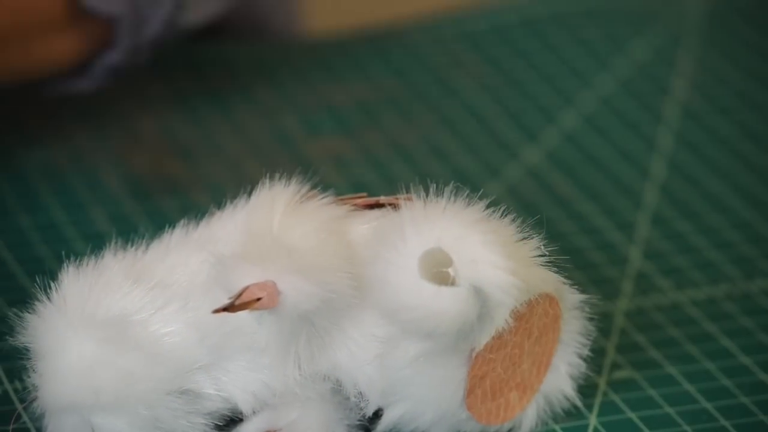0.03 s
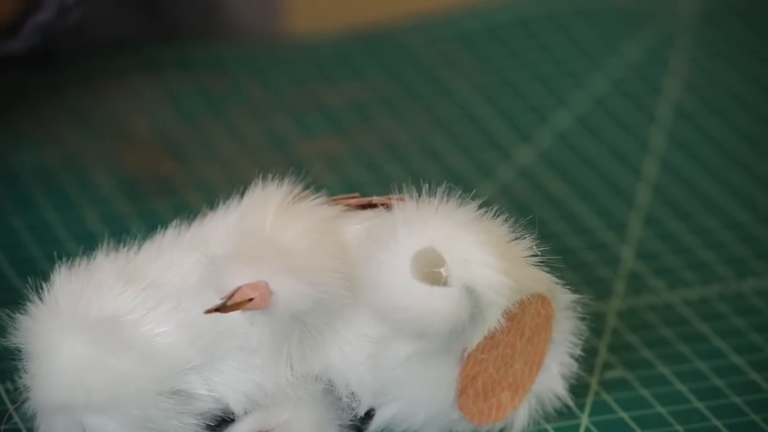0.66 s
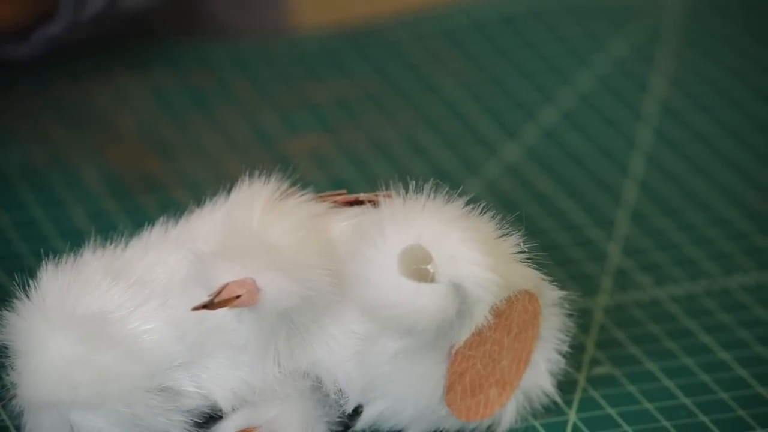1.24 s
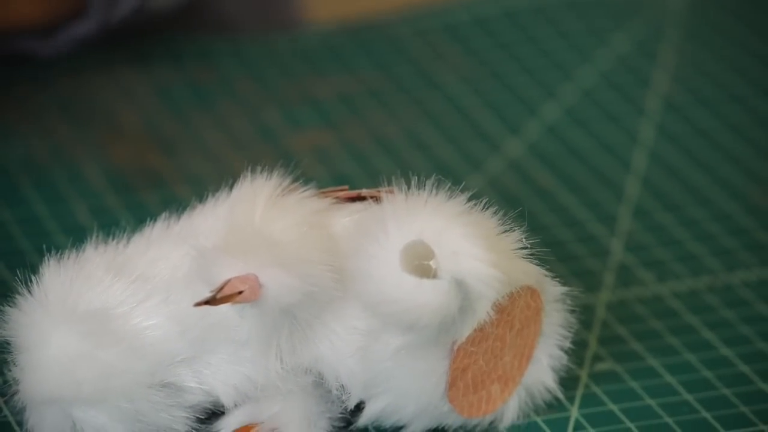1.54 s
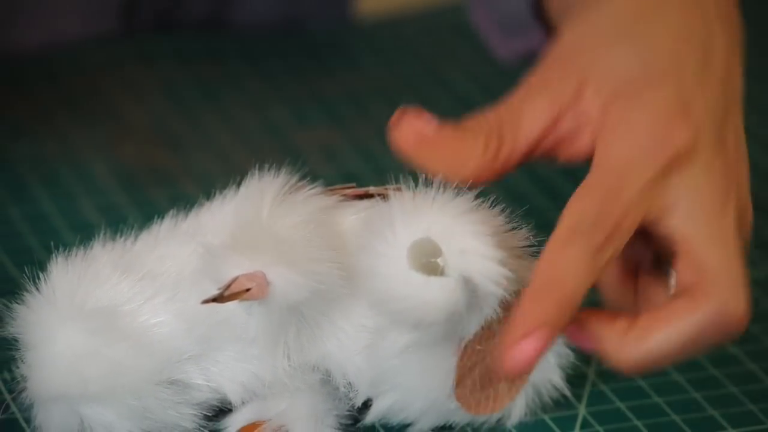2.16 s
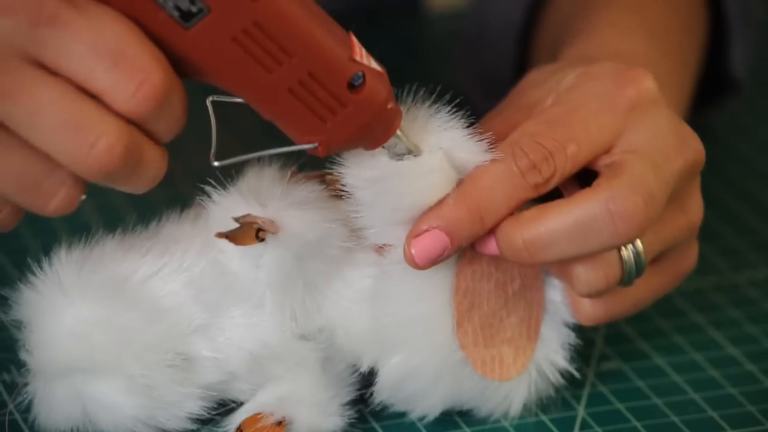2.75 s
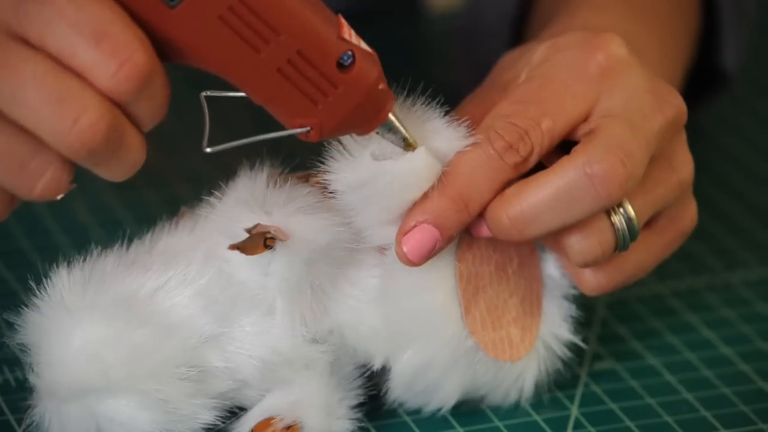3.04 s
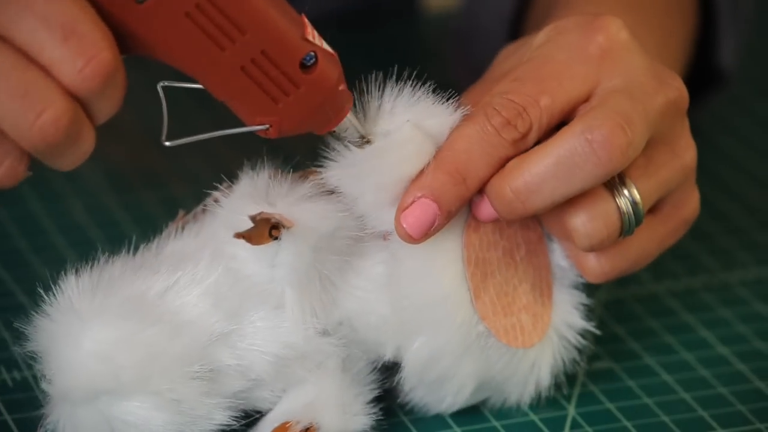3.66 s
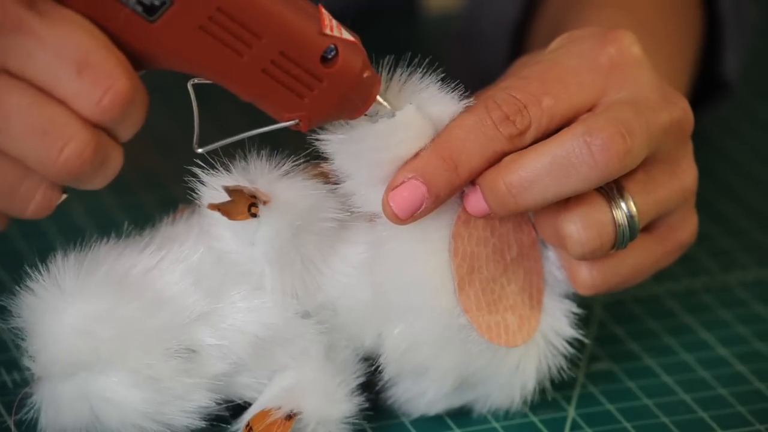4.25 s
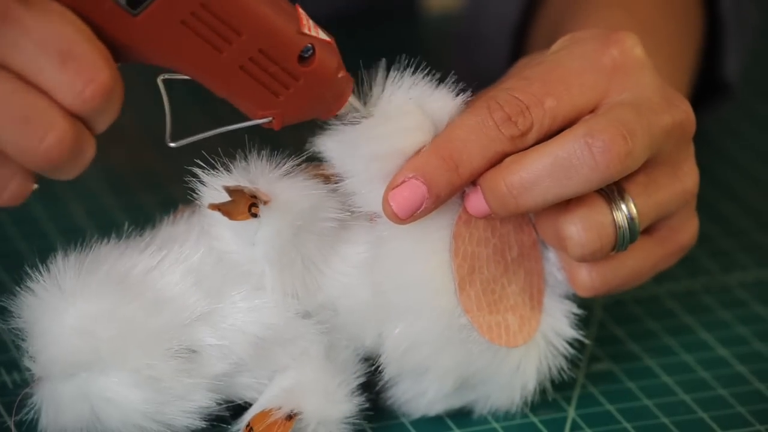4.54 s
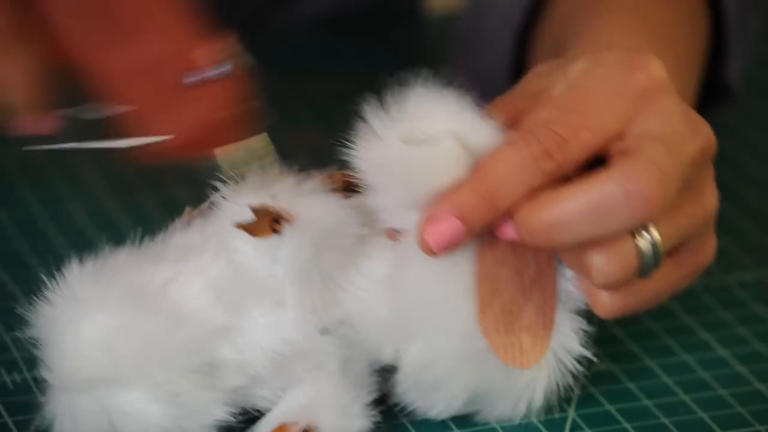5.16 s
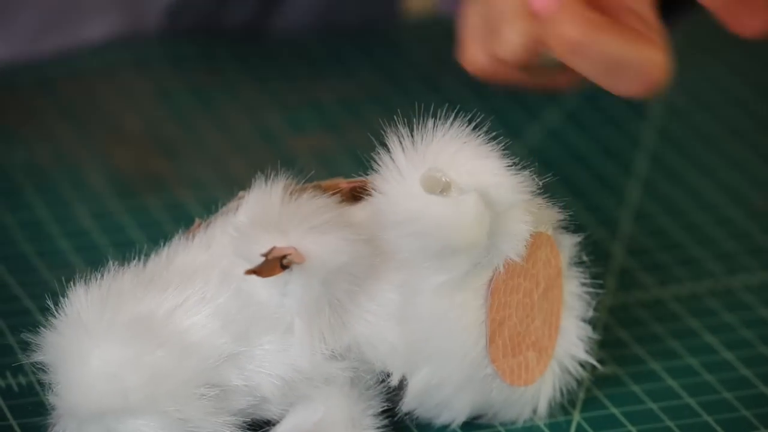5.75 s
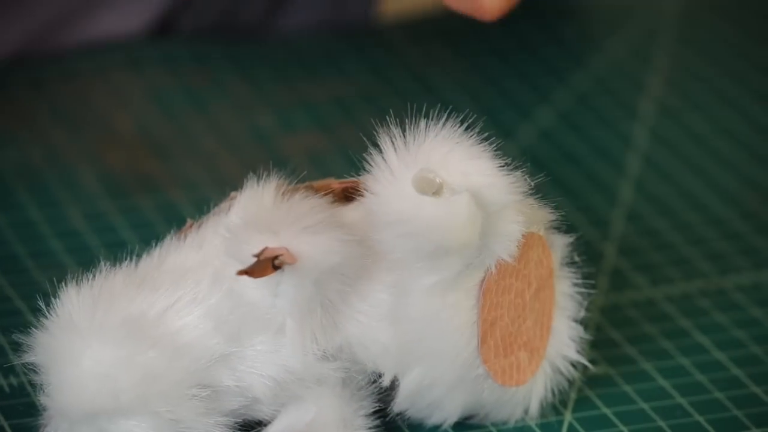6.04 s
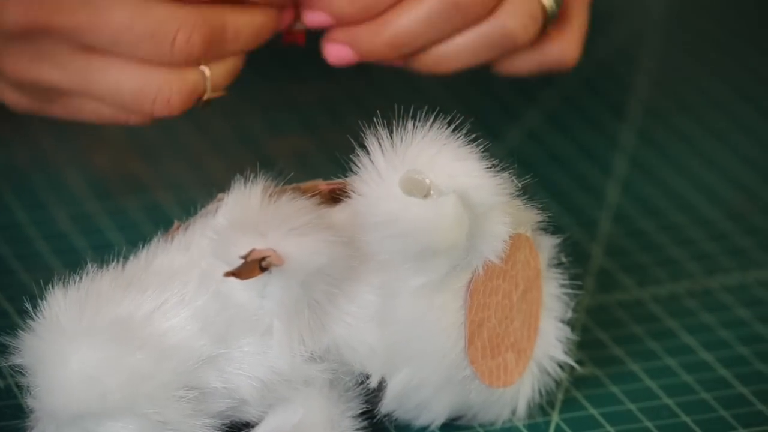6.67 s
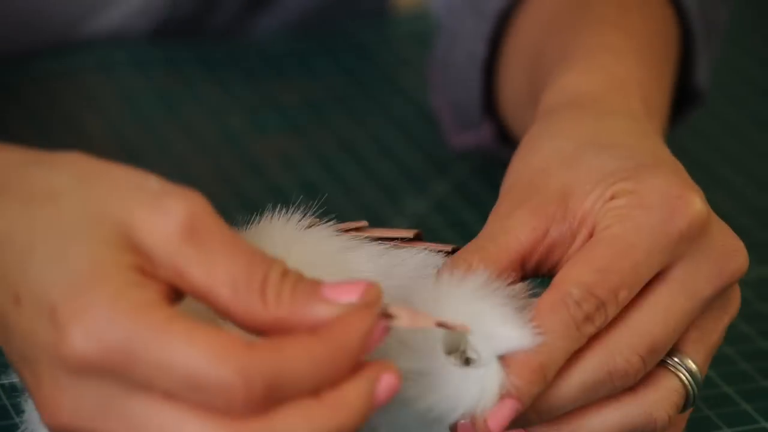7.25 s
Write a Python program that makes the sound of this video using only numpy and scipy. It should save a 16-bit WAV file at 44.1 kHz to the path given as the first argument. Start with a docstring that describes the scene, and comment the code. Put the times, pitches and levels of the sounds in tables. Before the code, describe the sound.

Hands work at a craft table in a small, live room. In the first half second, soft low bumps on a cutting mat come with a close plastic clack and a brush of fur. From about 1.2 to 2.3 seconds a plastic glue gun is handled and picked up, with clacks, short scrapes, juddering slides and light table knocks. Near 2.7 seconds its trigger gives two faint rasps, followed by a quiet stretch with tiny ticks. At 5 seconds the wire stand rings briefly amid clicks and scrapes. At about 5.5 seconds comes the loudest moment: the gun is set down with a sharp clatter and a ringing table thump. Roomier scuffs follow until 6 seconds, then soft fur strokes and very faint finger squeaks around 7 seconds. Stirring sleeves, steady air and a faint, thin electronic whine lie underneath throughout.

```python
"""A craft table with a cutting mat in a small live room, where hands work on a furry piece.
Close to the microphone a plastic glue gun is picked up, creaks as it is squeezed, and is set down
with a clatter of its shell and a thump that rings the table top. Pieces scrape and judder over the
mat. Further off, with more of the room on them, things scuff and fingers stroke fur and squeak.
Under it all lie stirring sleeves, steady air and a thin electronic whine."""
import sys
import numpy as np
from scipy import signal
from scipy.fft import rfft, irfft, next_fast_len
from scipy.io import wavfile

SR = 44100
rng = np.random.default_rng(int(sys.argv[2]) if len(sys.argv) > 2 else 0)


def dump_mix(stems):
    """Bounce the given channels to the path in sys.argv[1] as a 16-bit WAV at rate SR."""
    frames = np.atleast_2d(stems).T  # one column per channel
    limited = np.clip(frames, -1, 1)  # hard clip at full scale
    pcm = np.round(limited * 32767).astype(np.int16)
    wavfile.write(sys.argv[1], SR, pcm)


N = 322371

# The table top's modes. Each row: frequency in Hz, level in dB, undamped time to fall 60 dB in seconds.
TABLE_MODES = [(127, -11, .17), (166, 0, .17), (205, -8, .07), (262, -4, .05), (320, -5, .05),
               (385, -7, .06), (463, -9, .13), (780, -17, .07)]
# The tone of hard plastic. Each row: frequency in Hz, spectral level in dB.
PLASTIC_SPECTRUM = [(40, -36), (800, -12), (1250, 4), (2400, 3), (3400, -2), (5200, -2.5), (7000, -11.5),
                    (15000, -33.5)]
# The tone of a soft rub. Each row: frequency in Hz, spectral level in dB.
SCUFF_SPECTRUM = [(60, -18.5), (170, -1), (800, 6), (1400, 2), (4200, -6.5), (9000, -16.5), (14000, -29.5)]
RIPPLE_DB, SCUFF_RISE_S = 2.5, .003


def plastic_shell(drive, main_hz, peak_db, dull_db, width_octaves=.2):
    """Each contact favours one resonance; the tone falls dull_db per octave far above, half that below."""
    def db_at(hz):
        octaves = np.log2((hz + 1) / main_hz)
        peak = peak_db / (1 + (octaves / width_octaves) ** 2)
        beyond = np.maximum(octaves - 1, 0) + np.maximum(-octaves - .5, 0) / 2
        return read(PLASTIC_SPECTRUM, hz) + ripple(hz) + peak - dull_db * beyond
    return colour(drive, db_at)


def clacks(ring_s=0.0023, span_s=0.00034):
    """Hard plastic is struck: an impulse and a dense ring. Hard blows snap, light ones chatter and ring."""
    # Each row: start in seconds, level in dB, main resonance in Hz, left over right in dB.
    blows = [(.1928, -19.5, 2350, 25), (.2002, -12.5, 3670, 1), (1.269, -10.5, 2490, 3.5),
             (1.7734, -13, 2110, 3.5), (1.8064, -16, 2120, 1), (5.1045, -21, 2450, 1),
             (5.121, -14, 1520, 1), (5.4492, -8.5, 4800, 17.5), (5.4724, -6, 2250, -2),
             (5.5335, -7, 3920, 2)]
    out, t = np.zeros((2, N)), np.arange(900) / SR
    for s, db, hz, lean_db in blows:
        z = rng.standard_normal((3, len(t)))
        chatter = 0.089 * gain_of(-0.2 * db) * (0.12 * z[2] + z[:2]) * np.exp(-t / ring_s)
        clack = plastic_shell((t == 0) + chatter, hz, peak_db=-.36 * db, dull_db=14)
        packed_rms = np.sqrt(np.sum(clack ** 2) / (2 * span_s * SR))  # its energy packed into span_s
        add(out, s, gain_of(db) * sides(lean_db) * clack / packed_rms)
    return out


def ticks(swell_s=0.001585):
    """A light touch scratches for a moment and brings out one resonance of the shell."""
    # Each row: time in seconds, peak level in dB, pitch in Hz.
    touches = [(.521, -28.5, 5500), (.648, -27, 5300), (0.666, -33, 4320), (1.058, -39.5, 3700),
               (1.182, -29.5, 2180), (1.2174, -26, 1800), (1.28, -19.5, 1260), (1.35, -29.5, 1600),
               (1.691, -23, 2190), (1.716, -17.5, 4270), (2.008, -29.5, 1820), (2.1018, -27, 2380),
               (2.71, -24.5, 2410), (3.102, -46.5, 4230), (3.185, -40, 4230), (3.3274, -35, 2450),
               (3.418, -40.5, 4180), (3.7008, -39.5, 2310), (5.079, -18, 1740), (5.243, -23, 1800),
               (5.3118, -28, 1870), (6.6408, -38, 3500)]
    out, t = np.zeros((2, N)), np.arange(SR // 50) / SR
    for s, db, hz in touches:
        z = rng.standard_normal((3, len(t)))
        scratch = (z[:2] + z[2]) * t * np.exp(-t / swell_s)
        tick = plastic_shell(scratch, hz, peak_db=11, dull_db=14, width_octaves=.15)
        add(out, s - swell_s, gain_of(db) * tick / abs(tick).max())
    return out


def scrapes(slips_per_s=700, grit=0.2):
    """Plastic sticks and slips, and the quick uneven slips ring the shell."""
    # Each row: start and length in seconds, level in dB, main resonance in Hz, dulling in dB per octave.
    drags = [(0.171, 0.045, -30, 2600, 14), (0.1784, 0.007, -18.5, 4800, 20),
             (1.225, 0.074, -36.5, 1460, 3.5), (1.276, 0.1, -48.5, 1350, 18),
             (1.4385, 0.0081, -28.5, 2400, 24), (1.727, 0.027, -31.5, 2200, 20),
             (2.408, .06, -50, 1610, 22), (5.068, 0.052, -33, 1480, 31), (5.164, 0.062, -38, 1330, 19)]
    out = np.zeros((2, N))
    for s, length, db, hz, dull_db in drags:
        count = int(length * SR)
        z = rng.standard_normal((4096, 4))[:count].T
        slips = z[2] * (rng.random(4096)[:count] < slips_per_s / SR)
        drive = (slips + grit * (z[:2] + z[3]) / 2) * signal.windows.tukey(z.shape[1], .4)
        rasp = plastic_shell(drive, hz, peak_db=6, dull_db=dull_db)
        add(out, s, gain_of(db) * rasp / np.sqrt(np.sum(rasp ** 2) / (2 * count)))
    return out


def trigger_squeezes(body_hz=(1190, 2730, 3730), hollow_db=8.5, width_hz=120):
    """The glue stick rasps forward through the gun's hollow body."""
    # Each row: start in seconds, level in dB.
    pulls = [(2.712, -45), (2.809, -41)]

    def db_at(hz):
        hollow = sum(hollow_db / (1 + ((hz - mode) / width_hz) ** 2) for mode in body_hz)
        return read(SCUFF_SPECTRUM, hz) + 5 * np.log2(hz + 1) + ripple(hz) + hollow
    out, t = np.zeros((2, N)), np.arange(SR // 2) / SR
    for s, db in pulls:
        z = rng.standard_normal((3, len(t)))
        rasp = unit_rms(colour(z[:2] + z[2] / 2, db_at)[:, :len(t)])
        add(out, s, gain_of(db) * rasp * envelope(t, SCUFF_RISE_S, hold_s=0.018, fade_s=0.047))
    return out


def wire_stand(start_s=5.015, db=-35, modes_hz=(2530, 2595)):
    """As the gun is pulled away, its wire stand is shaken into a short ring of two beating modes."""
    out, t = np.zeros((2, N)), np.arange(SR // 2) / SR
    ring = sum(np.sin(2 * np.pi * (hz * t + rng.random((2, 1)))) for hz in modes_hz)
    shaken = unit_rms(ring * (1 + .5 * flutter(len(t), 200)))
    add(out, start_s, gain_of(db) * shaken * envelope(t, rise_s=.07, hold_s=.1, fade_s=.025))
    return out


def table_thumps(contact_s=0.0018, hand_damping_db_per_s=111, skew_radians=.35):
    """A padded push rings the table top; the hand stays on the piece and shortens the ring."""
    # Each row: start in seconds, peak level in dB, factor on the modes' pitch.
    blows = [(0.2033, -19, 1.45), (1.81, -22, 1.9), (1.876, -26, 1.39), (2.216, -25, 1.48),
             (2.286, -26, 1.42), (5.4808, -7.5, 1.02)]
    out, t = np.zeros((2, N)), np.arange(SR // 2) / SR
    push = np.sin(np.pi * np.minimum(t / contact_s, 1)) ** 2
    for s, db, pitch in blows:
        ring = np.zeros((2, len(t)))
        for hz, mode_db, t60 in TABLE_MODES:
            decay = gain_of(mode_db - (60 / t60 + hand_damping_db_per_s) * t)
            skew = skew_radians * rng.standard_normal((2, 1))  # the two sides are a little out of step
            ring += decay * np.sin(2 * np.pi * hz * pitch * t + skew)
        ring *= 1 - np.exp(-t * gain_of(db) / 0.00014)  # light touches sink into the mat slowly
        # little of the thump sounds below its lowest mode
        low_cut = signal.butter(4, 130 * pitch, "high", fs=SR, output="sos")
        thud = signal.sosfilt(low_cut, signal.fftconvolve(ring, push[None], axes=1)[:, :len(t)])
        add(out, s, gain_of(db) * sides(lean_db=3) * thud / abs(thud).max())
    return out


def arm_bumps(roughness=.55, sag=.7, sag_s=.012):
    """Hands and arms bump the mat: a few rough, low cycles that sag as the soft contact relaxes."""
    # Each row: start in seconds, level in dB, final pitch in Hz.
    landings = [(.055, -33, 145), (.153, -33, 165), (.200, -24, 125), (.342, -34, 155), (.455, -31, 115),
                (.522, -33, 155)]
    out, t = np.zeros((2, N)), np.arange(SR // 10) / SR
    for s, db, hz in landings:
        cycles = np.cumsum(hz * (1 + sag * np.exp(-t / sag_s))) / SR
        swell = cycles * np.exp(1 - cycles)  # peaks after one cycle
        scrunch = np.sin(2 * np.pi * cycles + roughness * flutter(len(t), 2 * hz))
        scrunch *= 1 + roughness * flutter(len(t), 2 * hz)
        add(out, s, gain_of(db) * (swell * scrunch)[None])
    return signal.sosfilt(signal.butter(4, 85, "high", fs=SR, output="sos"), out)


def mat_slides(judder_db=2, catches_per_s=120, grit_db=-16, ring_db=6, width_hz=14):
    """Juddering friction makes the table rumble at its modes, and small catches tick in the plastic."""
    # Each row: start in seconds, level in dB, hold time in seconds.
    shoves = [(0, -39.5, 0.018), (0.221, -40.5, 0.039), (0.654, -38.5, 0.005), (1.553, -38.5, 0.014),
              (1.707, -34, 0.21), (1.797, -28.5, 0.011), (2.216, -33.5, 0.0061), (2.258, -36, 0.086),
              (5.062, -35, 0.15), (5.323, -39, .09), (5.401, -26.5, 0.079), (5.582, -33.5, 0.1)]
    # Friction on the mat. Each row: frequency in Hz, spectral level in dB.
    friction_spectrum = [(40, -65), (90, -40), (150, -4), (210, 6), (560, 4), (2000, -13.5), (5000, -52)]

    def modes_db(hz):
        return sum(ring_db / (1 + ((hz - mode[0]) / width_hz) ** 2) for mode in TABLE_MODES)
    power, t = np.zeros((1, N)), np.arange(SR) / SR
    for s, db, hold_s in shoves:
        shove = gain_of(db) * envelope(t, rise_s=0.002, hold_s=hold_s, fade_s=0.064)
        add(power, s, shove[None] ** 2)
    judder = unit_rms(gain_of(judder_db * flutter(N, 70)))
    rumble = unit_rms(colour(noise(friction_spectrum), modes_db, size=8192)[:, :N])
    catches = plastic_shell(impulses(catches_per_s), main_hz=1350, peak_db=6, dull_db=7)
    grit = gain_of(grit_db) * unit_rms(catches[:, :N])
    return np.sqrt(power) * (judder * rumble + grit)


def scuffs(grain_db=2.0, hold_share=0.41):
    """Things brush together further from the microphone: grainy noise that starts quickly and fades."""
    # Each row: start in seconds, level in dB, fade time in seconds, brightening in dB per octave.
    rubs = [(0.645, -35.5, 0.0049, 8.5), (1.511, -36.5, 0.024, 2), (1.713, -34.5, 0.07, 3),
            (4.529, -52, 0.021, 10.5), (5.026, -43, 0.11, 4.5), (5.406, -26, 0.026, -2),
            (5.482, -22.5, 0.006, 2.5), (5.59, -28.5, 0.059, 1), (5.867, -29.5, 0.054, 1.5),
            (6.365, -41.5, 0.01, 20.5), (6.929, -44, 0.027, -5)]
    out, t = np.zeros((2, N)), np.arange(SR // 2) / SR
    for s, db, fade_s, tilt_db in rubs:
        def db_at(hz):
            tilt = tilt_db * np.log2(np.maximum(hz, 200) / 1000)
            return read(SCUFF_SPECTRUM, hz) + ripple(hz) / 2 + tilt
        z = rng.standard_normal((3, len(t)))
        grains = (z[:2] + 0.67 * z[2]) * gain_of(grain_db * flutter(len(t), 603.6))
        brush = unit_rms(colour(grains, db_at)[:, :len(t)])
        add(out, s, gain_of(db) * brush * envelope(t, SCUFF_RISE_S, hold_share * fade_s, fade_s))
    return out


def fur_strokes(grain_db=1.0, snags_per_s=60, snag_db=-7):
    """Fingers stroke the fur; each stroke swells and fades with a fine, grainy hiss and small snags."""
    # Each row: start and length in seconds, level in dB, brightening in dB per octave.
    strokes = [(0.109, 0.18, -39, 1), (0.447, 0.33, -50, 7), (0.856, 0.28, -59, 3),
               (1.655, 0.079, -43.5, 6), (1.907, 0.76, -51, -9.5), (5.258, 0.27, -40, -3.5),
               (6.458, 0.76, -56, 5)]
    out = np.zeros((2, N))
    grain = gain_of(grain_db * flutter(N, 370))
    hiss = grain * noise([(50, -52), (300, -21.5), (1500, -2.0), (6000, -7.0), (14000, -25.5)])
    snags = colour(impulses(snags_per_s), lambda hz: read(PLASTIC_SPECTRUM, hz))[:, :N]
    rustle = unit_rms(hiss) + gain_of(snag_db) * unit_rms(snags)
    for s, length, db, tilt_db in strokes:
        part = rustle[:, int(s * SR):][:, :int(length * SR)]
        stroke = colour(part, lambda hz: tilt_db * np.log2(hz / 1000 + .5))[:, :part.shape[1]]
        add(out, s, gain_of(db) * unit_rms(stroke) * np.hanning(part.shape[1]))
    return out


def finger_squeaks(db=-62.5, fall_hz=220, jitter_hz=60):
    """Rubbing skin sticks and slips: faint, rough tones that each glide down."""
    # Each row: start and length in seconds, starting pitch in Hz.
    rubs = [(6.67, .1, 4730), (6.79, .17, 4830), (7.04, .12, 4580)]
    out = np.zeros((2, N))
    for s, length, hz in rubs:
        count = int(length * SR)
        pitch = hz - fall_hz * np.arange(count) / count + jitter_hz * flutter(count, 900)
        tone = np.sin(2 * np.pi * np.cumsum(pitch) / SR)
        add(out, s, gain_of(db) * signal.windows.tukey(count, .5) * tone[None])
    return out


def sleeves(fold_db=3.0):
    """Cloth stirs faintly as the arms move."""
    # Each row: time in seconds, level in dB.
    movement = [(0, -47.5), (1, -56), (2.1, -47), (3.101, -60), (4.9, -62.5), (6, -47), (6.35, -57.5),
                (6.9, -50.5), (7.3, -55.5)]
    db = np.interp(np.arange(N) / SR, *np.transpose(movement)) + fold_db * flutter(N, 40)
    return gain_of(db) * noise([(60, -22.0), (220, 3.0), (800, -4.0), (5000, -14.5), (14000, -27.5)])


def room_echo(x, first_s=0.0014, early_db=3, early_s=0.0018):
    """The small room returns dense reflections, strongest early on, each band dying at its own speed."""
    # Each row: frequency in Hz, time to fall 60 dB in seconds, level in dB.
    bands = [(100, 1, -16.5), (500, 0.086, 3.5), (1590, 0.43, 1), (5500, 0.47, -8.5), (13900, 0.1, -5)]
    reflections = rng.standard_normal((2, SR)) * (rng.random((2, SR)) < .1)
    hz, t, spectra = signal.stft(reflections, SR, nperseg=256)
    t60, db = (read(np.array(bands)[:, [0, k]], hz)[:, None] for k in (1, 2))
    decay = gain_of(db - 60 * t / t60 + early_db * np.exp(-t / early_s))
    tail = signal.istft(spectra * decay, SR, nperseg=256)[1]
    tail *= np.arange(tail.shape[1]) / SR > first_s
    return signal.fftconvolve(x, tail / np.linalg.norm(tail[0]), axes=1)[:, :N]


def room_tone(air_db=-57, whine_db=-76, whine_hz=11025):
    """Steady air and a thin electronic whine."""
    # Each row: frequency in Hz, spectral level in dB.
    air_spectrum = [(20, -57.5), (86, -18), (107, -5.5), (250, -3), (1570, -14.5), (2490, -23),
                    (10600, -29.5), (15500, -37)]
    whine = np.sin(2 * np.pi * whine_hz * np.arange(N) / SR)
    return gain_of(air_db) * noise(air_spectrum) + gain_of(whine_db) * whine


def noise(spectrum):
    """Steady stereo noise of rms 1, shaped by (Hz, dB) points and alike on both sides in the bass."""
    # Each row: frequency in Hz, correlation of left and right.
    likeness = [(250, 0.76), (600, 0.74), (1500, 0.19), (12000, 0.011)]
    size = next_fast_len(N)
    hz = np.fft.rfftfreq(size, 1 / SR)
    left, other = rfft(rng.standard_normal((2, size)))
    same = read(likeness, hz)
    right = same * left + np.sqrt(1 - same ** 2) * other
    return unit_rms(irfft(np.array([left, right]) * gain_of(read(spectrum, hz)), size)[:, :N])


def impulses(per_s):
    """Sparse random ticks, at the same moments on both sides but with different strengths."""
    return rng.standard_normal((2, N)) * (rng.random(N) < per_s / SR)


def flutter(count, per_s):
    """A smooth random curve that takes a new value per_s times a second."""
    return np.interp(np.arange(count) * per_s / SR, np.arange(4096), rng.standard_normal(4096))


def ripple(hz, spacing_hz=130):
    """Many small resonances in dB, different at every place of contact."""
    return RIPPLE_DB * np.interp(hz / spacing_hz, np.arange(512), rng.standard_normal(512))


def colour(x, db_at, size=2048):
    """Causal filter with the gain db_at(Hz): nothing sounds before the blow."""
    log_gain = np.log(gain_of(db_at(abs(np.fft.fftfreq(size, 1 / SR)))))
    taps = np.fft.ifft(np.exp(np.conj(signal.hilbert(log_gain)))).real[:size // 2]
    return signal.oaconvolve(x, taps[None], axes=1)


def envelope(t, rise_s, hold_s, fade_s):
    """Attack, hold, release."""
    return (1 - np.exp(-t / rise_s)) * np.exp(-np.maximum(t - hold_s, 0) / fade_s)


def gain_of(db):
    """Decibels to a factor."""
    return 10 ** (np.asarray(db) / 20)


def unit_rms(x):
    """Scales to rms 1."""
    return x / np.sqrt(np.mean(x ** 2) + 1e-20)


def read(points, hz):
    """Reads a table on a log-frequency axis."""
    f, value = np.transpose(points)
    return np.interp(np.log(hz + 1), np.log(f + 1), value)


def sides(lean_db):
    """Left and right gains, the left louder by lean_db."""
    return gain_of(np.array([[lean_db], [-lean_db]]) / 2)


def add(mix, s, sound):
    """Lays a sound into the mix at s seconds."""
    part = mix[:, max(round(s * SR), 0):][:, :sound.shape[1]]
    part += sound[:, :part.shape[1]]


def scene(plastic_wet_db=-12, table_wet_db=-14, brush_wet_db=-6):
    """Plastic and table, close to the microphone, stay fairly dry; the brushing sounds fill the room."""
    plastic = clacks() + ticks() + scrapes() + wire_stand()
    table = table_thumps() + arm_bumps() + mat_slides()
    brushes = scuffs() + trigger_squeezes() + fur_strokes() + finger_squeaks()
    echo = room_echo(gain_of(plastic_wet_db) * plastic + gain_of(table_wet_db) * table
                     + gain_of(brush_wet_db) * brushes)
    return plastic + table + brushes + echo + sleeves() + room_tone()


def record(dry):
    """Clips at full scale, then cuts the treble above 15.2 kHz."""
    low_pass = signal.firwin(301, 15200, window=("kaiser", 8), fs=SR)
    return signal.oaconvolve(np.clip(dry, -1, 1), low_pass[None], "same")


dry = scene()
out = record(dry)
dump_mix(out)
```